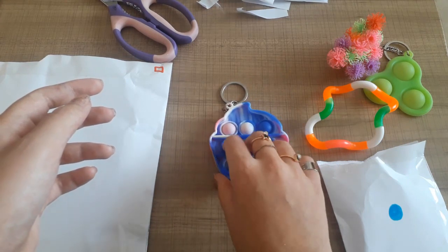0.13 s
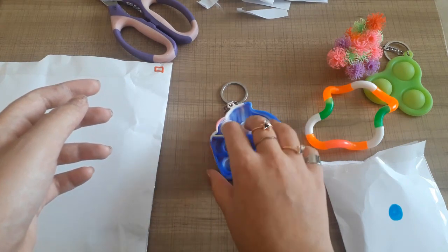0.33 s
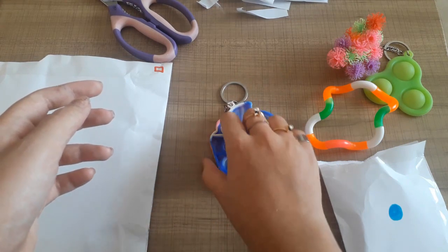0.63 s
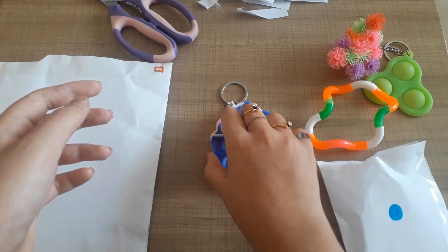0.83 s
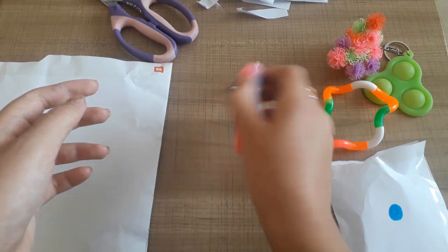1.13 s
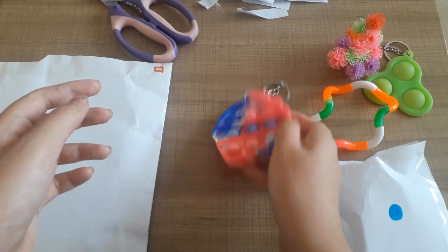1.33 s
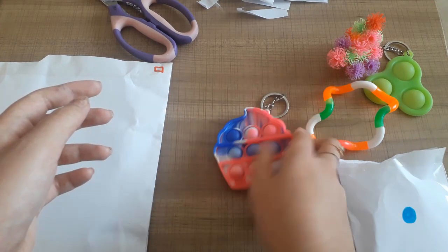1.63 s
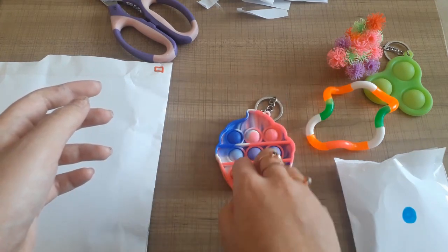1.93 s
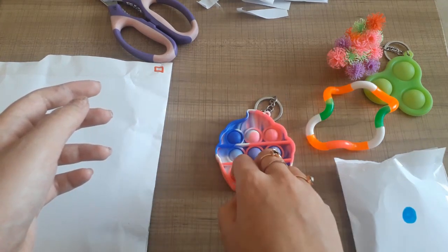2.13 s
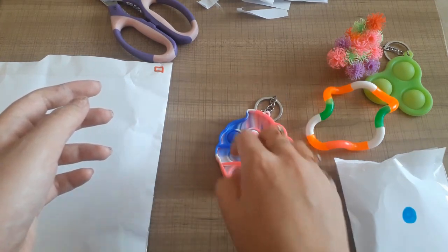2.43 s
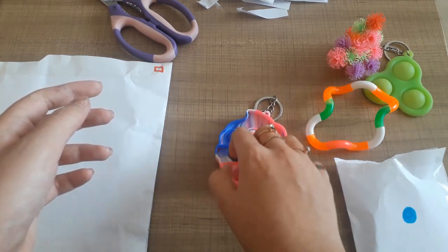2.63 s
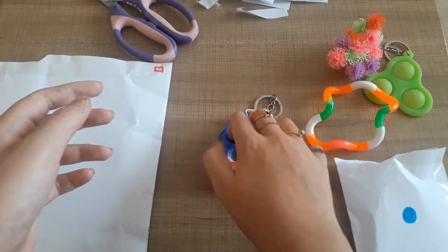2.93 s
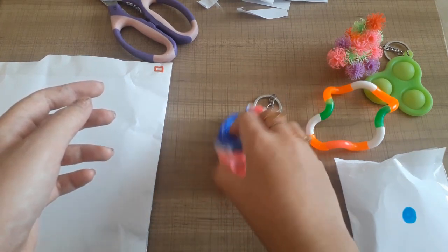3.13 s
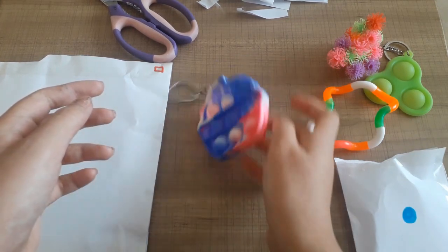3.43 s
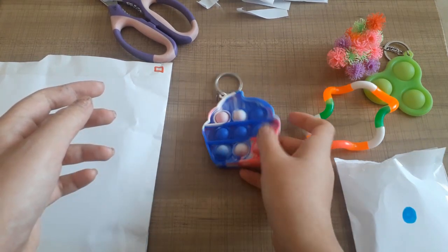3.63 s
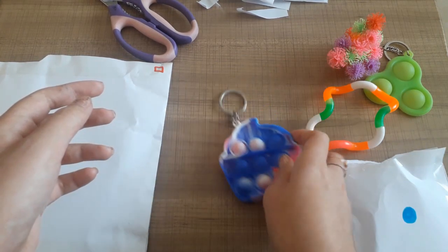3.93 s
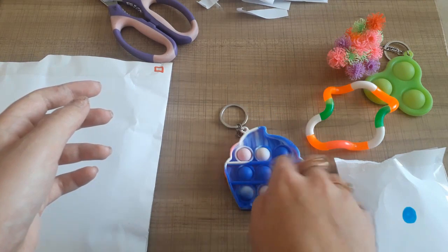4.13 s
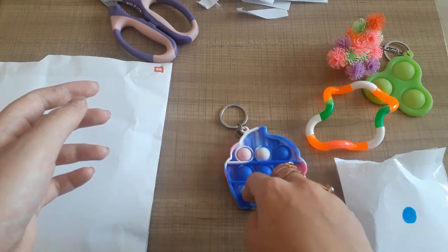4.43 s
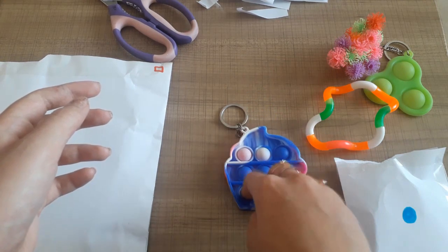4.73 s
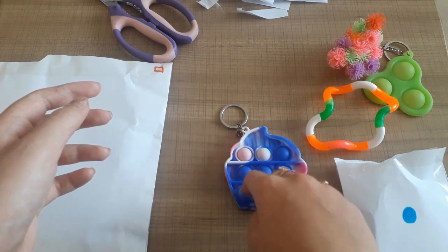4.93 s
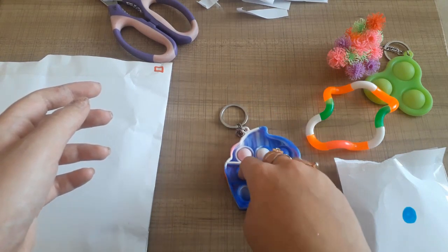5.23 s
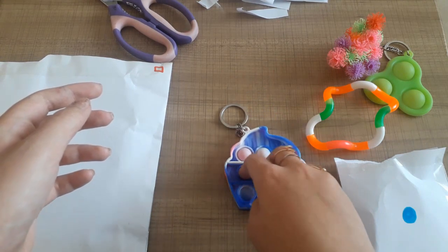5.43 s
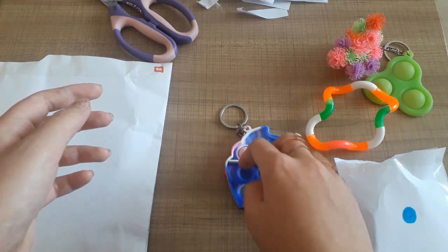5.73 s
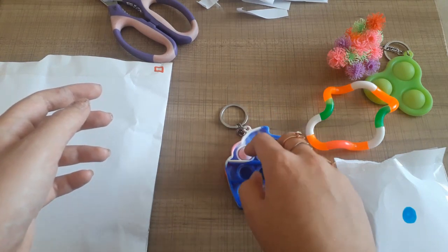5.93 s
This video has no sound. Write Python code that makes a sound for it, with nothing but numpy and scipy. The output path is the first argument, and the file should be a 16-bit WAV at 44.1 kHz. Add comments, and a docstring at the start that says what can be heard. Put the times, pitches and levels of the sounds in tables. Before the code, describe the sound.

Close indoor handling of a rubbery popping toy: light clicks and creasing skin, a hard clattery slap as it is turned over, then rapid hollow pops, some loud enough to clip. It is turned again with softer slaps, scraping hops and a tiny squeak, rubbed into place, and popped irregularly. Short room echo and a low, steady background hiss remain throughout.

```python
"""A silicone bubble toy on a key ring lies on a wooden desk in a small quiet room.
At first the echo of an earlier pop dies away; fingers crease the skin and flip domes, which pop as their air swings.
Then the toy is turned over: it slides and slaps down with a rattle, made of short bursts of rough noise.
After more and louder pops it is turned over again, with a thin whine, slaps down and is dragged, hopping and
squeaking as it sticks and slips. A rough narrow rub settles it, and more pops end the scene over a steady noise."""
import sys
import numpy as np
from scipy import signal
from scipy.fft import rfft, irfft
from scipy.io import wavfile
from scipy.ndimage import uniform_filter1d

SR = 44100
rng = np.random.default_rng(int(sys.argv[2]) if len(sys.argv) > 2 else 0)


def to_wav(s):
    """Save 16-bit WAV."""
    ch = np.atleast_2d(s).T  # columns
    pcm = np.round(np.clip(ch, -1, 1) * 32767)  # PCM
    wavfile.write(sys.argv[1], SR, pcm.astype(np.int16))


N = 267775
LEAD = 4410   # samples worked out ahead of the start, so that an earlier pop can echo into it

# The sound colour of hard rubs and slaps on the desk. Each row: frequency in Hz, relative level in dB per Hz.
SCUFF_COLOUR = [(88, -52.5), (150, -15.5), (259, -11), (328, -10), (790, 3), (923, -2), (1190, 1),
                (2920, -3), (5050, -5.5), (13200, -33), (16000, -31)]


def amp(db):
    """Turn decibels into a gain."""
    return 10 ** (np.asarray(db) / 20)


def coloured(x, spectrum, tilt_db=0):
    """Shape a sound by a spectrum, tilted in dB per octave about 2 kHz, and bring it to an rms of 1."""
    hz = np.maximum(np.fft.rfftfreq(len(x), 1 / SR), 10)
    points = np.array(spectrum)
    db = np.interp(np.log(hz), np.log(points[:, 0]), points[:, 1])
    db = db + tilt_db * np.log2(hz / 2000)
    y = irfft(rfft(x) * amp(db), len(x))
    return y / np.sqrt(np.mean(y ** 2))


def add(track, s, sound):
    """Mix a sound in at time s, in seconds."""
    i = LEAD + round(s * SR)
    track[i:i + len(sound)] += sound[:len(track) - i]


def high_pass(x, order, hz):
    """Take out the deep bass, which small things hardly radiate."""
    return signal.sosfilt(signal.butter(order, hz, "high", fs=SR, output="sos"), x)


def grainy(count, rough_db):
    """Friction is uneven: noise whose level wanders from about one millisecond to the next."""
    steps = rng.standard_normal(count // 40 + 2)
    wander = np.interp(np.arange(count) / 40, np.arange(len(steps)), steps)
    return rng.standard_normal(count) * amp(rough_db * wander)


def bursts(rows, spectrum, rise_s):
    """Brief rough contacts: grainy noise that rises fast and then dies away, t60 being the time to fall 60 dB."""
    out = np.zeros(LEAD + N)
    t = np.arange(4096) / SR
    rise = np.sin(np.clip(t / rise_s, 0, 1) * np.pi / 2)
    for s, db, t60, tilt_db in rows:
        fall = amp(-60 * np.maximum(t - rise_s, 0) / t60)
        add(out, s, amp(db) * rise * fall * coloured(grainy(len(t), 2.5), spectrum, tilt_db))
    return out


def touches(rows):
    """A hard touch is a single click, one for each row of time and strength in dB."""
    out = np.zeros(LEAD + N)
    for s, db in rows:
        add(out, s, amp([db]))
    return out


def ring(clicks, modes):
    """A struck thing rings at several pitches (modes) at once, each dying at its own pace."""
    out = 0
    for hz, db, t60 in modes:
        decay = amp(-60 / (t60 * SR))   # per sample
        turn = 2 * np.pi * hz / SR
        top, bottom = [0, np.sin(turn)], [1, -2 * decay * np.cos(turn), decay * decay]
        out = out + amp(db) * signal.lfilter(top, bottom, clicks + 1e-18)
    return out


def stick_slip(rows, partials_db, wobble_share):
    """Skin sticks and slips at slightly uneven speed, which gives a tone with a stack of partials."""
    s, rate_hz, db = np.transpose(rows)
    t = np.arange(s[0], s[-1], 1 / SR)
    wobble = 10 * uniform_filter1d(rng.standard_normal(len(t)), size=100)
    phase = 2 * np.pi * np.cumsum(np.interp(t, s, rate_hz) * (1 + wobble_share * wobble)) / SR
    tone = sum(amp(level_db) * np.sin(k * phase) for k, level_db in enumerate(partials_db, 1))
    level = amp(np.interp(t, s, db) + 0.46 * wobble)
    out = np.zeros(LEAD + N)
    add(out, s[0], signal.windows.tukey(len(t), .2) * level * tone)   # soft ends
    return out


def pops():
    """A dome flips: the air in its cup swings, the skin snaps with a click, then overshoots and rebounds."""
    # Domes flipping. Each row: time of the fullest swing in seconds, height of the swing's swell in dB,
    # cup pitch in Hz, length in ms (the swell is fullest after 0.57 of it),
    # snap level in dB relative to the swell (the snap peaks at twice this).
    pop_rows = [(0.2332, -45, 2400, 1.3, -7), (0.5356, -36.5, 1720, 0.48, -24),
                (0.6517, -30, 830, 2.6, -27), (0.6927, -11.5, 835, 1.35, -32.5),
                (1.0025, -30.5, 1810, 1.1, -8.5), (1.5736, -22.5, 1700, 1.1, -12.5),
                (1.7287, -23, 1280, .65, -6), (1.9539, -33.5, 1567, 0.61, -23.5),
                (2.0182, -43.5, 1096, 2.2, -10.5), (2.3025, -10, 1010, 1.67, -34),
                (2.3133, 5.5, 1250, 1.5, -13.5), (2.3203, 3.5, 1210, 1.07, -21.5),
                (2.331, -2, 1370, 0.4, -23), (2.3378, .2, 1010, 3.6, -13), (2.6116, 1.5, 1220, 0.59, -21),
                (2.6337, -6.5, 1350, 0.78, -7), (2.6394, 0.9, 1420, 0.75, -20),
                (2.8591, -22, 1070, 1.2, -24.5), (2.8812, 0, 1380, 0.79, -25),
                (2.8893, 0.4, 1930, 0.85, -17.5), (2.9072, -9, 1230, 1.26, -7),
                (3.1458, -25, 1415, 1.4, -16.5), (3.216, -29, 1550, 0.49, -22),
                (4.1157, -2.5, 1130, 0.72, -17), (4.1205, -12, 1336, 0.53, -31),
                (4.3014, -27.5, 1230, 0.71, -26), (4.655, -41, 1320, 2.3, -17.5),
                (4.682, -43, 1100, 1.3, -17), (4.7225, -48, 3980, 1.7, -24),
                (4.7935, -9.5, 1047, 1.78, -35), (5.2159, -31.5, 1284, 1.6, -31),
                (5.2558, -40.5, 826, 1.55, -16), (5.5886, -7, 1870, 0.72, -8.5),
                (5.7743, -27, 1405, 1.26, -24), (5.7829, -32, 1350, 2.5, -18),
                (5.8322, -6, 1454, 2.02, -29.5), (5.9027, -21, 1465, 0.91, -30.5),
                (6.0022, -38.5, 1290, 0.65, -22)]
    # A pop before the start, of which only the echo is heard: the same columns without the time.
    earlier_pop = (-15, 996, 2, -14.5)
    # The flipped skin overshooting. Each row: typical lag in seconds, level in dB for a flip of 1 ms.
    rebounds = [(.0012, -10), (.0023, -17), (.0036, -24)]
    # The sound colour of the snap. Each row: frequency in Hz, relative level in dB per Hz.
    snap_colour = [(1500, -18), (3000, 4), (5000, 1.5), (6500, -0.5), (8500, 3.5), (10500, -33),
                   (16000, -18)]
    tail_db, tail_t60_s = -13, 0.0071   # the click trails a little crackle
    out = np.zeros(LEAD + N)
    t = np.arange(1024) / SR
    for s, db, hz, length_ms, snap_db in [(-.04, *earlier_pop), *pop_rows]:
        top = length_ms / 1000 * 0.57
        swell = (t / top * np.exp(1 - t / top)) ** 2.64   # rises, peaks at top, dies
        cup = amp(db) * swell * np.sin(2 * np.pi * hz * (top - t))
        late = np.maximum(t - 1.3 * top, 0)
        crackle = rng.standard_normal(len(t)) * amp(tail_db - 60 * late / tail_t60_s) * (late > 0)
        crackle[np.argmax(late > 0)] = 1   # the click itself
        snap = coloured(crackle, snap_colour, 4.5 * np.log2(hz / 1300))   # tighter, higher cups snap brighter
        snap = 2 * snap / np.max(np.abs(snap))
        add(out, s - top, cup + amp(db + snap_db) * snap)
        softened = uniform_filter1d(cup, size=9)
        for lag_s, rebound_db in rebounds:
            strength = amp(rebound_db) / max(length_ms, .7) ** 2   # quick flips rebound hardest
            add(out, s - top + lag_s * rng.uniform(.8, 1.2), strength * softened)
    return out


def slaps():
    """Toy and chain slap and rattle on the desk in short rough bursts."""
    # Each row: start in seconds, level in dB, t60 in seconds, brightness in dB per octave.
    slap_rows = [(0.294, -55.5, .13, 4), (1.085, -47, 0.082, 9), (1.1, -38, 0.054, 12),
                 (1.121, -33.5, .025, 7.5), (1.128, -37.5, 0.028, 5.5), (1.284, -16, 0.069, 1.5),
                 (1.305, -23, 0.26, -0.3), (1.364, -4, 0.026, 6), (1.415, -27, .043, 14),
                 (1.423, -17, 0.16, 2.5), (1.618, -45.5, 0.075, 5), (1.656, -31, 0.12, 5.5),
                 (1.741, -32.5, 0.08, -1.5), (1.764, -17, 0.049, -2.5), (1.774, -18, 0.061, 6),
                 (1.786, -22, 0.08, 1.5), (2.862, -43.5, 0.057, 1), (3.275, -48, 0.036, 0),
                 (3.296, -43.5, .023, 10), (3.398, -24.5, 0.15, 0.9), (3.44, -26, 0.017, -5),
                 (3.457, -29.5, 0.12, -2), (3.484, -15.5, 0.069, 1.6), (3.505, -16, 0.017, 2),
                 (3.517, -17.5, .066, 4), (3.55, -16.5, 0.045, 2), (3.569, -21.5, 0.087, 1.5),
                 (3.632, -27, 0.094, 2.2), (3.651, -19, 0.0051, 3), (3.674, -27.5, 0.074, 6.5),
                 (3.695, -21, 0.086, 2.5), (4.105, -30.5, 0.041, 2), (4.134, -43, 0.021, 9),
                 (4.149, -32, 0.028, 5), (4.184, -47, 0.025, 7), (4.169, -30, .075, 4.5),
                 (4.805, -27.5, 0.022, -4.5), (5.821, -42.5, 0.019, 1.5)]
    return bursts(slap_rows, SCUFF_COLOUR, .0033)


def judder():
    """The dragged toy catches and hops at a quickening beat, each hop duller than the last."""
    start_s, gap_s, hurry_s, t60_s = 3.753, .0525, .0011, 0.073
    level_db, spread_db, tilt_db, dulling_db = -28, 1.5, 2.2, 0.34   # tilt and dulling are per octave
    count = 8
    hops = []
    for k in range(count):
        s = start_s + gap_s * k - hurry_s * k ** 2
        db = level_db + spread_db * rng.standard_normal()
        if k == count - 1:
            db -= 5   # the last hop is feeble
        hops.append((s, db, t60_s, tilt_db - dulling_db * k))
    return bursts(hops, SCUFF_COLOUR, 0.0073)


def slides():
    """The toy slides over the desk: a dull rub blended with a bright rustle swells, holds and fades."""
    # Each row: start in seconds, swell in seconds, hold in seconds, level in dB, fade in dB per second,
    # share of bright rustle from 0 to 1.
    slide_rows = [(1.07, 0.06, .002, -40, 238.5, 0.58), (3.2, .13, 0.0046, -45, 359.5, 0.56),
                  (3.559, .03, 0.57, -41, 300, 0.62), (4.108, 0.018, .002, -30.5, 131, 0.4),
                  (4.268, 0.021, 0.0021, -48, 92, 0.01)]
    # The colour of the dull part. Each row: frequency in Hz, relative level in dB per Hz.
    rub_colour = [(400, -24.5), (800, 1), (1150, 2), (2500, -12.5), (6000, -34.5)]
    swell_db, fade_db = 21.5, 40.5   # a slide starts and ends this far below its level
    out = np.zeros(LEAD + N)
    for s, swell_s, hold_s, db, fade_db_per_s, share in slide_rows:
        corners = np.cumsum([0, swell_s, hold_s, fade_db / fade_db_per_s])
        t = np.arange(0, corners[-1], 1 / SR)
        dull = coloured(grainy(len(t), 1.7), rub_colour)
        bright = coloured(grainy(len(t), 2.2), SCUFF_COLOUR, 0.98)
        level = amp(db + np.interp(t, corners, [-swell_db, 0, 0, -fade_db]))
        add(out, s, level * ((1 - share) * dull + share * bright))
    return out


def squeak():
    """Silicone sticks and slips on the desk hundreds of times a second, a squeak of six partials."""
    # Each row: time in seconds, slips per second, level in dB before that of each partial.
    squeak_rows = [(3.905, 485, -36.5), (3.95, 530, -42.5), (4.003, 500, -34.5), (4.04, 390, -55)]
    return stick_slip(squeak_rows, [3.5, 8, 2.0, -1, -2.0, -4.0], 0.043)


def whine():
    """A faint thin tone while the toy is lifted, a single nearly steady partial."""
    # Each row: time in seconds, pitch in Hz, level in dB before the 3 dB added below.
    whine_rows = [(3.175, 1590, -62), (3.3, 1590, -64), (3.339, 1604, -48.5), (3.385, 1612, -77)]
    return stick_slip(whine_rows, [3], 0.01)


def settling_rub():
    """A rough narrow rub as the toy settles, a single partial with a strongly wobbling pitch."""
    # Each row: time in seconds, middle pitch in Hz, level in dB before the 3 dB added below.
    settling_rows = [(4.33, 1116, -66), (4.41, 1150, -53), (4.48, 1142, -60.5), (4.58, 1125, -70.5)]
    return stick_slip(settling_rows, [3], 0.083)


def creases():
    """Silicone creases under a fingertip in soft, mostly dull bursts."""
    # Each row: start in seconds, level in dB, t60 in seconds, brightness in dB per octave.
    crease_rows = [(0.437, -41, 0.012, 0), (0.442, -32.5, 0.081, -2.5), (2.296, -47, 0.014, 12),
                   (2.575, -32.5, 0.016, 1), (2.582, -24, 0.017, 0.8), (2.597, -21.5, 0.019, -5.5),
                   (2.773, -31, .07, -1.5), (2.845, -40, 0.075, 1.1), (3.108, -33.5, 0.16, -0.3),
                   (5.147, -29, 0.059, -2)]
    # The sound colour of a crease. Each row: frequency in Hz, relative level in dB per Hz.
    crease_colour = [(120, -30), (200, -10.5), (572, -0.5), (1460, -2.5), (1660, 2.5), (3250, -17.5),
                     (3990, -23), (9000, -30), (11700, -70.5), (19800, -120)]
    return bursts(crease_rows, crease_colour, 0.0068)


def key_ring():
    """The steel ring is struck and rings faintly at a few high pitches."""
    # The ring being struck. Each row: time in seconds, strength in dB before the level of each mode.
    strikes = [(1.0016, -46), (1.1026, -28), (1.286, -14), (1.3648, -7), (3.2745, -36.5), (3.2959, -30.5),
               (3.4047, -25), (3.4421, -19.5)]
    # Its modes. Each row: pitch in Hz, level in dB, t60 in seconds.
    ring_modes = [(4630, -25, .08), (8050, -15, 0.11), (8400, -22.5, 0.075)]
    return ring(touches(strikes), ring_modes)


def desk():
    """Soft contacts, each spread over a millisecond, set the desk top ringing at low pitches."""
    # A fingertip or the toy landing. Each row: time in seconds, strength in dB before the level of each mode.
    thuds = [(0.447, -34), (0.6617, -39), (0.7027, -22.5), (1.288, -26), (1.369, -17.5), (1.422, -25.5),
             (1.622, -40), (1.739, -39), (1.775, -23), (1.788, -27), (2.3125, -29), (2.3303, -30.5),
             (2.587, -34), (2.601, -22.5), (2.6216, -21), (2.645, -29), (2.776, -35), (2.864, -40),
             (2.8912, -14.5), (2.8993, -19.5), (2.917, -31), (3.114, -23), (3.156, -38), (3.445, -37),
             (3.459, -20), (3.51, -23.5), (3.553, -30), (3.571, -32), (4.1257, -19.5), (4.152, -29),
             (4.311, -39.5), (4.665, -48), (4.8035, -18), (4.8116, -19.5), (5.153, -32), (5.226, -39.5),
             (5.266, -47), (5.5986, -27.5), (5.9127, -35.5)]
    # Modes of the desk top. Each row: pitch in Hz, level in dB, t60 in seconds.
    desk_modes = [(94.6, -19, .15), (133.9, -18.5, 0.024), (167.7, -18, .12), (212.3, -7.5, 0.086),
                  (260, -7, 0.046), (405, -10, 0.064)]
    return high_pass(ring(uniform_filter1d(touches(thuds), size=44), desk_modes), 4, 84)


def room(x):
    """Sparse echoes thicken into noise that dies band by band, each half an octave wide."""
    # Each row: frequency in Hz, t60 in seconds, relative level in dB.
    room_bands = [(100, 0.34, 0.5), (300, 0.32, 4), (780, 0.26, 5.5), (2137, 0.3, 3.5), (4900, 0.33, 0),
                  (8900, 0.3, -0.5), (14360, 0.22, -1.5)]
    hz, t60, db = np.transpose(room_bands)
    t = np.arange(SR // 2) / SR
    density = np.clip(t / 0.05, .1, 1)   # share of samples that hold an echo
    noise = rng.standard_normal(len(t)) * (rng.random(len(t)) < density) / np.sqrt(density)
    noise = noise * np.clip(t / 0.01, 0, 1)   # builds up over 10 ms
    edges = 60 * 2 ** np.arange(0, 8.1, .5)
    echo = 0
    for low, high in zip(edges, edges[1:]):
        centre = np.log(low * high) / 2
        band = signal.sosfilt(signal.butter(2, [low, high], "band", fs=SR, output="sos"), noise)
        fall_db = 60 * t / np.interp(centre, np.log(hz), t60)
        echo = echo + band * amp(np.interp(centre, np.log(hz), db) - fall_db)
    return signal.fftconvolve(x, echo / np.sqrt(np.sum(echo ** 2)))[:len(x)]


def floor():
    """A steady background noise, the same in both channels."""
    # Each row: frequency in Hz, relative level in dB per Hz.
    floor_colour = [(15, -45), (25, -15), (108, -1.5), (206, -10.5), (317, -13.5), (427, -21), (503, -14.5),
                    (560, -18), (2280, -23.5), (14800, -26.5), (16000, -16.5)]
    return amp(-58.5) * coloured(rng.standard_normal(N), floor_colour)


def channel_noise():
    """A fainter steady noise with opposite sign in the two channels, so that it sounds wide."""
    # Each row: frequency in Hz, relative level in dB per Hz.
    wide_colour = [(15, -40.5), (25, -2), (141, -1.5), (180, -7), (695, -12), (14800, -10.5),
                   (16000, -11.5)]
    return amp(-66) * coloured(rng.standard_normal(N), wide_colour) * [[1], [-1]]


def scene():
    """Toy, desk, room and background noise in the middle; a faint noise differs between the channels."""
    hits = pops() + slaps() + judder() + creases() + key_ring()
    rubs = slides() + squeak() + whine() + settling_rub()
    near = high_pass(hits + rubs, 3, 150) + desk()
    middle = (near + amp(-10) * room(near))[LEAD:]
    return middle + floor() + channel_noise()


def record(dry):
    """The loudest peaks are cut off flat, then the top of the treble is filtered away."""
    treble_cut = signal.cheby2(14, 80, 15800 * 1.04, fs=SR, output="sos")   # 80 dB down from here up
    return signal.sosfilt(treble_cut, np.clip(dry, -.97, .97))


dry = scene()
out = record(dry)
to_wav(out)
```